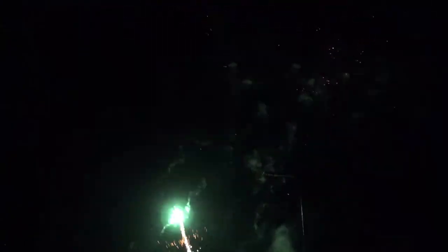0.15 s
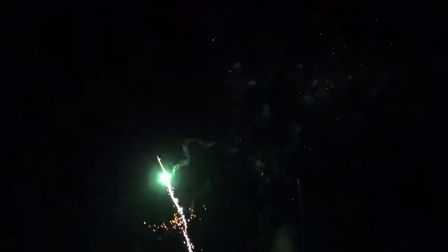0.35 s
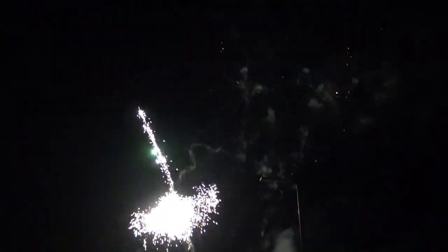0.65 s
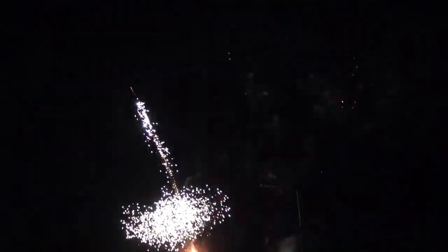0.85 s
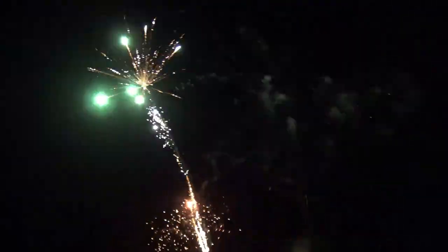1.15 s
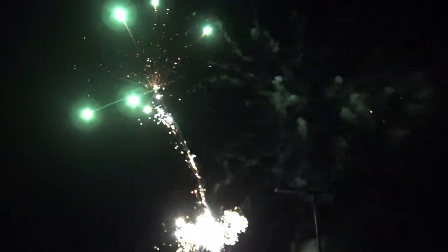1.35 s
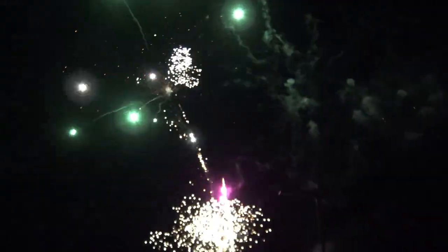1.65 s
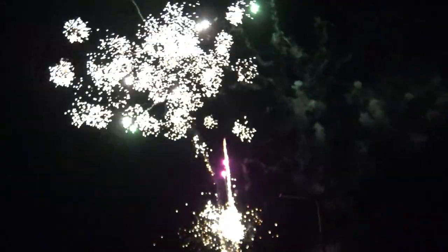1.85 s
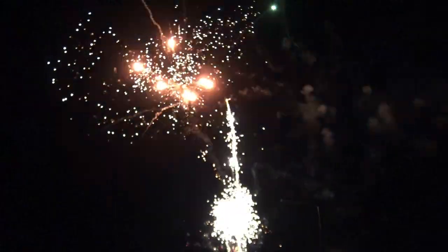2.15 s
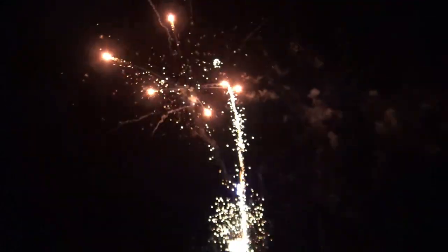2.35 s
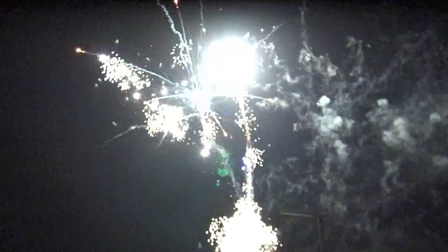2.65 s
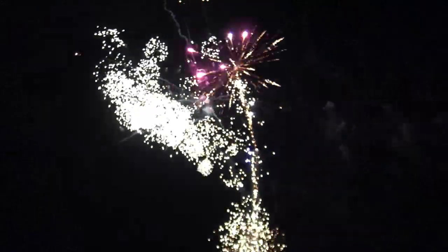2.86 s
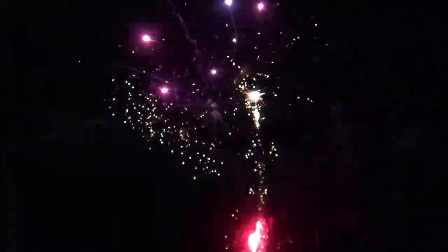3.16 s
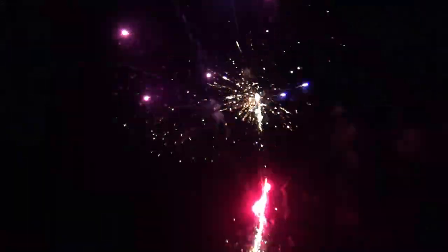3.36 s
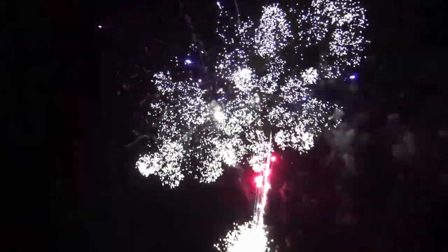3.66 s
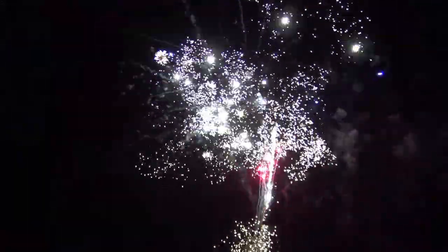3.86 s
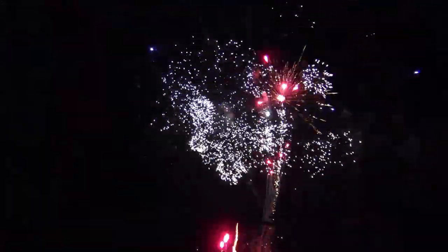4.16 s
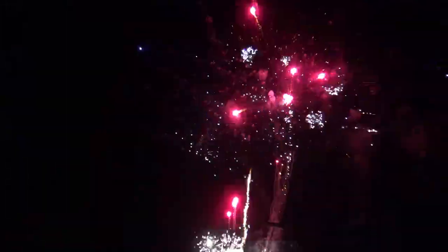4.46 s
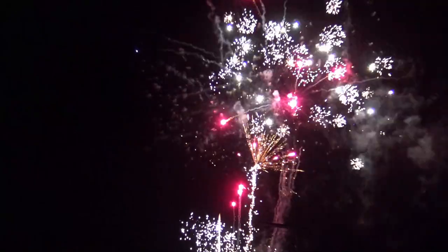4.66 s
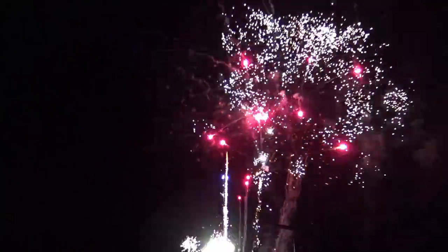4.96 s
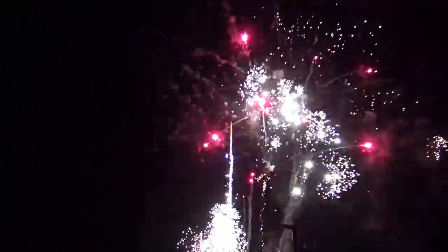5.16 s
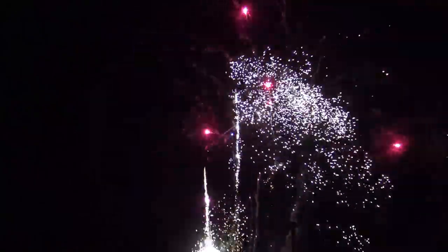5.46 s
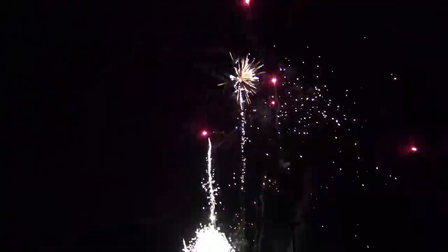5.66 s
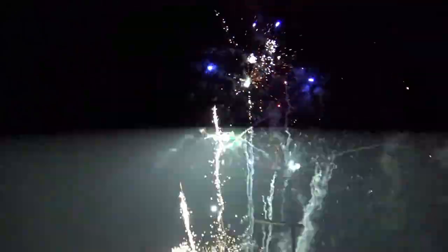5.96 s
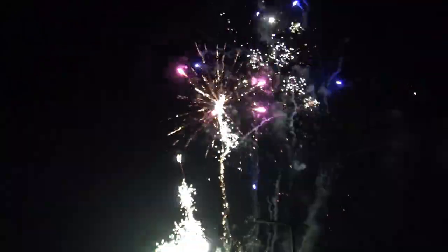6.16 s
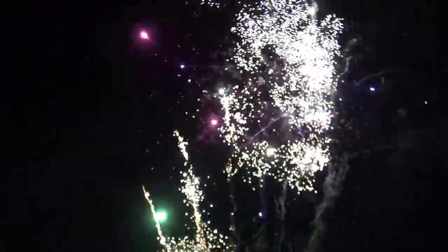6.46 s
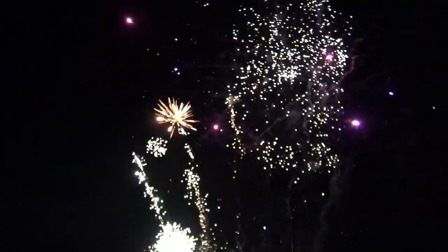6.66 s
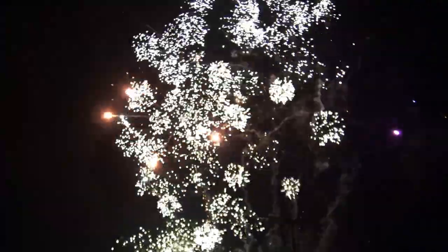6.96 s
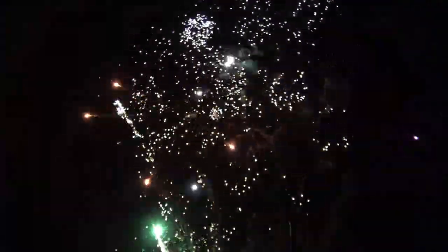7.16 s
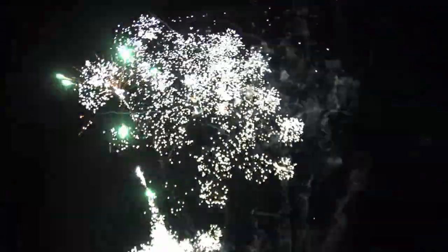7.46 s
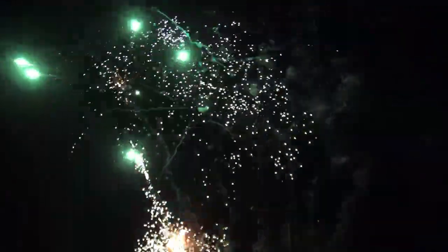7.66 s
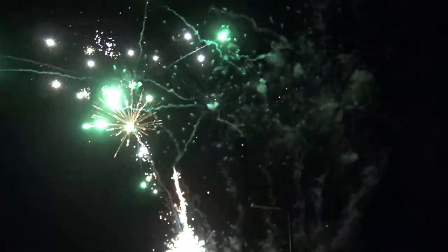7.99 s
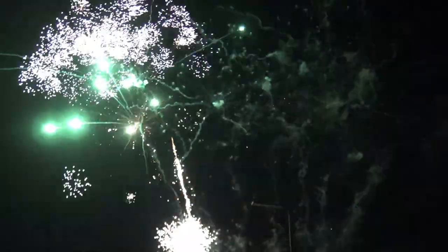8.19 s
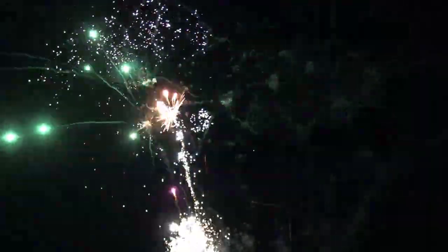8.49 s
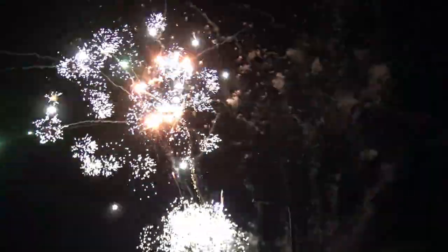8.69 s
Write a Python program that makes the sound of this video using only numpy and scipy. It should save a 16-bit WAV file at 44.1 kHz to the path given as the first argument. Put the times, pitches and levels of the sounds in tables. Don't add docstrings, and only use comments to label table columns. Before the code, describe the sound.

Close fireworks: punchy launch thuds, heavy shell bangs with short rolling echoes, and wave after wave of brittle, snapping crackle outdoors.

```python
import sys
import numpy as np
from scipy import signal
from scipy.io import wavfile

SR = 44100
rng = np.random.default_rng(int(sys.argv[2]) if len(sys.argv) > 2 else 0)


def wav_record(signal):
    frames = np.transpose(np.atleast_2d(signal))
    bounded = np.clip(frames, -1, 1)
    quanta = np.round(bounded * 32767).astype(np.int16)
    wavfile.write(sys.argv[1], SR, quanta)


def makeup_ratio(level_db):
    decades = np.asarray(level_db, float) / 20
    return 10 ** decades


N = 389403

# (time [s], peak [dB], ground echo delay [ms], ground echo [dB])
SHELL_BURSTS = [(1.1845, 5, 5.7, -6), (2.2379, 4, 6.3, -5), (2.9405, 5, 6.9, -5), (3.4018, 5, 6.6, -4),
                (4.2556, 5, 6.5, -5), (4.7473, 4, 4.6, -8), (5.8534, 5, 7.0, -4), (6.235, 5, 6.3, -5),
                (6.8615, 4, 5.8, -7), (7.5047, 5, 6.1, -7), (8.0897, 3.5, 5.3, -7), (8.6728, 4, 5.6, -7)]
# (time [s], peak [dB])
LIFT_CHARGES = [(.1206, 0), (.912, -1.5), (1.441, -2.5), (2.0289, -2.5), (3.0228, -3.5), (3.9264, -2),
                (4.5109, -3), (4.9969, -4.5), (5.5113, -5), (6.108, -4), (6.9194, -6), (8.0854, -6),
                (8.499, -6.5)]
# (delay [s], level [dB])
FAR_WALL = [
    (0.0795, -25.5),
    (0.1314, -16.5),
]
# (time [s], peak [dB])
FUSE_SPITS = [
    (0.1078, -14),
    (0.1394, -20.5),
    (0.195, -45),
]
# (thickest moment [s], level [dB], catching [s], dying [s])
STAR_CLOUDS = [(.85, -16.5, .17, 0.28), (1.18, -25.5, 0.17, 0.5), (1.65, -16, .23, 0.2),
               (2.02, -18, 0.16, 0.33), (2.2, -20, 0.18, 0.13), (2.36, -25, 0.167, 0.184),
               (2.56, -29, .12, 0.18), (2.92, -18, 0.28, 0.4), (2.72, -29, 0.099, .1),
               (3.42, -33.5, 0.14, 0.21), (3.8, -17.5, .28, .24), (4.09, -17, 0.16, 0.33),
               (4.54, -32, 0.088, 0.51), (4.94, -20.5, 0.14, 0.4), (5.22, -25.5, 0.079, .25),
               (5.451, -18, 0.14, 0.14), (5.61, -25.5, 0.089, 0.21), (5.759, -28, .15, .1),
               (5.889, -33, 0.12, 0.25), (6.24, -25.5, .25, 0.3), (6.57, -23.5, .24, .4),
               (6.89, -28, 0.19, 0.077), (7.09, -24.5, .17, .2), (7.281, -39, 0.087, 0.057),
               (7.62, -22.5, 0.27, 0.2), (7.92, -43.5, .25, 0.26), (8.11, -35.5, 0.063, 0.14),
               (8.37, -23.5, 0.29, 0.18), (8.69, -35, 0.058, 0.23), (8.84, -24.5, 0.11, .2)]
# (time [s], peak [dB])
LONE_SNAPS = [(0.0605, -3), (0.0778, -8), (0.484, -20), (0.5312, -8), (0.5345, -11), (0.5774, -9),
              (0.6025, -13), (0.6085, -10), (0.6766, 0), (0.6875, -5), (0.6953, -1), (0.7123, -1),
              (0.7246, -1), (0.7419, -1), (0.7461, 1), (0.7617, 0), (0.9728, -1), (1.102, 0),
              (1.1451, -2), (1.1741, 0), (1.2523, 0), (1.3132, -1), (1.3584, -1), (1.4053, -2),
              (1.4266, -1), (1.5005, 0), (1.7939, 0), (1.8341, -4), (1.9136, -1), (1.9289, 0),
              (2.4858, -7), (2.5101, -7), (2.5502, -2), (2.5968, -3), (2.6514, -3), (2.6824, -1),
                     (2.7018, 0), (2.7602, -1), (3.3059, -8), (3.3218, -5), (3.3437, -4), (3.3626, -7),
                     (3.4752, -4), (3.5285, -5), (3.5667, -6), (3.6232, 0), (3.9626, -5), (4.0025, -4),
                     (4.355, -4), (4.4279, -10), (4.4731, -13), (4.5407, -3), (4.5616, -5), (4.5948, 0),
                     (4.642, -4), (4.6523, -3), (4.6727, -1), (4.6994, -5), (4.7266, -1), (4.7877, -1),
              (5.1367, -4), (5.1802, -5), (5.2057, -2), (5.3044, -2), (5.3507, -6), (5.7333, -4),
                   (5.7818, -4), (5.8055, -4), (5.832, -6), (5.971, -14), (5.9996, -13), (6.0323, -14),
                   (6.0681, -11), (6.081, -10), (6.3712, -10), (6.4729, -5), (6.8103, -8), (6.9374, -5),
                   (6.9908, -8), (7.2702, -10), (7.3656, -15), (7.421, -11), (7.7424, -8), (7.8616, -14),
                   (7.9253, -17), (8.0158, -12), (8.3456, -2), (8.5784, -13), (8.6146, -11), (8.6262, -11),
              (0.6535, -12), (0.7449, 0), (1.5436, -1), (1.718, 0), (1.7536, 0), (1.8586, -6),
                  (1.94, -2), (1.9594, 0), (1.9738, 0), (2.3219, 0), (2.3301, -2), (2.3473, 0),
                  (2.3561, -1), (2.3683, 0), (2.6451, -2), (2.6964, -1), (2.7083, 0), (2.7122, 0),
                  (2.7255, -1), (2.7689, 0), (2.7835, 0), (3.0782, 0), (3.1251, 0), (6.1575, -8),
                  (6.1845, -7), (7.2112, -15), (8.665, -12), (8.717, -12), (8.7477, -10), (8.7735, -8)]
# (time [s], level [dB])
WIND_GUSTS = [(.1, -30), (.4, -39), (.8, -31), (1.35, -37), (2.04, -34), (2.45, -37), (3.46, -34.5),
              (4.13, -55), (6.149, -58), (5.0, -58), (6.98, -58), (7.6, -64), (8.14, -52)]

FINER_DB_PER_S = 0.82


def bursts():
    s, db, echo_ms, echo_db = np.transpose(SHELL_BURSTS)
    fronts = centred_clicks(s, makeup_ratio(db))
    fronts += centred_clicks(s + echo_ms / 1000, makeup_ratio(db + echo_db))
    boom = convolve(fronts, shell_shock())
    second_bounce = centred_clicks(s + echo_ms / 530, makeup_ratio(db - 12))
    bounce = band(convolve(second_bounce, shell_shock()), "low", 700)
    roll = np.zeros((2, N))
    roll_levels = 1.5 - 1.9 * s
    for start, roll_db in zip(np.round(s * SR).astype(int), roll_levels):
        near = makeup_ratio(-13) * clutter(start_ms=8, t60=.09, per_s=700, alike=.75)
        far = makeup_ratio(roll_db) * clutter(start_ms=18, t60=.38, per_s=600, alike=.65)
        shock = boom[:, start:start + SR // 100]
        echoes = convolve(np.pad(shock, [[0, 0], [0, SR // 2]]), near + far)
        roll[:, start:start + echoes.shape[1]] += echoes[:, :N - start]
    return boom + bounce + band(roll, "low", 490, order=1)


def shell_shock():
    ms = np.arange(SR // 50) / SR * 1000
    push = np.clip(1 - (ms / .6) ** 3, 0, 1)
    inward = np.abs(swing(hz=385, decay_ms=6, delay_ms=.6, cycles=.5))
    suction = -inward ** .5 * (ms < 1.9)
    rebound = (ms > 1.9) * (1 - np.exp(-(ms - 1.9) / .2)) * np.exp(-(ms - 1.9) / 3.2)
    return .85 * push + .6 * suction + .24 * rebound


def lifts():
    s, db = np.transpose(LIFT_CHARGES)
    fired = centred_clicks(s, makeup_ratio(db))
    grounded = fired + centred_clicks(s + .0018, makeup_ratio(db - 10))
    thump = convolve(grounded, 1.5 * blast(push_ms=.65, suck_ms=.45))
    thump += convolve(fired, .45 * swing(hz=178, decay_ms=60, delay_ms=.8, cycles=1))
    thump += puffs(s, makeup_ratio(db - 22.5), decay_ms=0.97)
    near = convolve(thump, clutter(start_ms=5.5, t60=.08, per_s=900, alike=.8))
    out = thump + makeup_ratio(-12) * near
    distant_crack = band(fired, "band", [900, 2000], order=1)
    wash = convolve(distant_crack, clutter(start_ms=72, t60=0.53, per_s=4900, alike=0.73))
    for delay, wall_db in FAR_WALL:
        shift = round(delay * SR)
        out[:, shift:] += makeup_ratio(wall_db) * band(thump, "low", 2200)[:, :-shift]
    spit_s, spit_db = np.transpose(FUSE_SPITS)
    return out + makeup_ratio(12.5) * wash + puffs(spit_s, makeup_ratio(spit_db), decay_ms=3.3)


def puffs(s, gain, decay_ms):
    white = rng.standard_normal((3, N))
    fading = np.exp(-np.arange(SR // 50) / SR * 1000 / decay_ms)
    turbulence = band(white[0] + .5 * white[1:], "band", [500, 9000], order=1)
    return convolve(centred_clicks(s, gain), fading) * turbulence


def crackle():
    s, gain = star_snaps()
    draws = rng.standard_normal((N // 8, 4))[:len(s)]
    lag, pan_db = 0.97 * draws[:, 0], 0.5 * draws[:, 1]
    echo_s = .003 + .002 * np.abs(draws[:, 2])
    echo_gain = makeup_ratio(-9 + 3 * draws[:, 3])
    patch = rng.integers(0, 10, N // 8)[:len(s)]
    out = np.zeros((2, N))
    for k in range(10):
        these = patch == k
        fronts = clicks(s[these], gain[these], lag[these], pan_db[these])
        ground = clicks((s + echo_s)[these], (gain * echo_gain)[these], -lag[these], pan_db[these])
        fronts += makeup_ratio(2.0) * band(ground, "low", 4300, order=1)
        paths = makeup_ratio(-12.5) * clutter(start_ms=0.41, t60=0.044, per_s=3000, alike=0.73)[:, :SR // 30]
        paths[:, 0] = 1
        snap = blast(push_ms=0.073 * 1.1226 ** k, suck_ms=0.088 * 1.113 ** k)
        out += convolve(fronts, convolve(paths, snap))
    dulled = band(out, "low", 6800, order=1)
    far = convolve(dulled, clutter(start_ms=30, t60=0.56, per_s=2700, alike=0.4))
    return out + makeup_ratio(-15.5) * far


def star_snaps():
    level_db = cloud_level()
    density_db = .95 * (np.maximum(level_db, -35) + 28) + FINER_DB_PER_S * np.arange(N) / SR
    lit = np.arange(N) > .68 * SR
    chance = rng.random((N, 2))

    small = np.flatnonzero(chance[:, 0] < 165 * makeup_ratio(density_db) * lit / SR)
    spread_db = 4.5 * np.minimum(-np.log(chance[small, 1]), 1.9)
    small_db = level_db[small] - density_db[small] / 2 + 15.0 + spread_db

    large = np.flatnonzero(chance[:, 0] > 1 - 16 * lit / SR)
    ceiling_db = 6 - FINER_DB_PER_S * large / SR
    large_db = np.minimum(level_db[large] + 18.5, ceiling_db) + 9.5 * chance[large, 1]

    lone = np.array(LONE_SNAPS)
    lone_s, lone_db = lone.T
    s = np.r_[lone_s - 2 / SR, large / SR, small / SR]
    return s, makeup_ratio(np.r_[lone_db + 2.5, large_db, small_db])


def cloud_level():
    edge_db, roundness, embers_db = 20.5, 1.7, -46
    t = np.arange(0, N + 64, 64) / SR
    s, db, catch_s, die_s = np.array(STAR_CLOUDS).T[:, :, None]
    away = np.abs(t - s) / np.where(t < s, catch_s, die_s)
    clouds_db = db - edge_db * away ** roundness
    level = power_sum(np.r_[clouds_db, [embers_db + 0 * t]])
    return np.interp(np.arange(N) / SR, t, level)


def night_air():
    lumps = makeup_ratio(2.0 * rms_one(band(rng.standard_normal((2, N)), "low", 4.3)))
    white = rng.standard_normal((3, N))
    rumble = band(0.7 * white[0] + white[1:], "band", [20, 60], order=1)
    wind = rms_one(lumps * rumble) * makeup_ratio([[-2.5], [2.5]])
    hush = rms_one(band(white[0] + white[1:], "band", [150, 2500]))
    return makeup_ratio(wind_level() + 4.0) * band(wind, "low", 83) + makeup_ratio(-47) * hush


def wind_level():
    t = np.arange(N) / SR
    breeze = -44 - 4.2 * t
    gusts = [db - 47 * np.abs(t - s) for s, db in WIND_GUSTS]
    return power_sum([breeze] + gusts)


def blast(push_ms, suck_ms):
    t = np.arange(SR // 50) / SR * 1000
    push = np.clip(1 - t / push_ms, 0, 1)
    after = np.maximum(t - push_ms, 0) / suck_ms
    suck = after * np.exp(-after)
    return push - suck * push.sum() / suck.sum()


def swing(hz, decay_ms, delay_ms, cycles):
    t = np.maximum(np.arange(SR // 50) / SR - delay_ms / 1000, 0)
    return -np.sin(2 * np.pi * np.minimum(hz * t, cycles)) * np.exp(-1000 * t / decay_ms)


def clutter(start_ms, t60, per_s, alike):
    t = np.arange(SR // 2) / SR
    taps = rng.standard_normal((3, len(t)))
    taps = taps * (rng.random((3, len(t))) < per_s * (1 + 40 * t) / SR)
    taps = np.sqrt(alike) * taps[0] + np.sqrt(1 - alike) * taps[1:]
    taps = taps * makeup_ratio(-60 * t / t60) * (t > start_ms / 1000)
    return taps / np.sqrt(np.sum(taps ** 2) / 2)


def clicks(s, gain, lag, pan_db):
    out = np.zeros((2, N + 2))
    for side, sign in enumerate((1, -1)):
        at = np.clip(s * SR + sign * lag / 2, 0, N - 1)
        whole = at.astype(int)
        port_gain = gain * makeup_ratio(sign * pan_db / 2)
        np.add.at(out[side], whole, port_gain * (1 - at + whole))
        np.add.at(out[side], whole + 1, port_gain * (at - whole))
    return out[:, :N]


def centred_clicks(s, gain):
    return clicks(s, gain, lag=0 * s, pan_db=0 * s)


def convolve(x, pulse):
    return signal.oaconvolve(x, np.atleast_2d(pulse), axes=1)[:, :N]


def band(x, kind, hz, order=2):
    sos = signal.butter(order, np.clip(hz, 10, .45 * SR), kind, fs=SR, output="sos")
    return signal.sosfilt(sos, x)


def rms_one(x):
    return x / np.sqrt(np.mean(x ** 2) + 1e-20)


def power_sum(levels_db):
    return 10 * np.log10(np.sum(makeup_ratio(2 * np.asarray(levels_db)), axis=0))


def scene():
    return lifts() + bursts() + crackle() + night_air()


def roll_off(x):
    return signal.sosfilt(signal.butter(12, 16510, fs=SR, output="sos"), x)


def record(dry):
    lifted = dry + 0.47 * band(dry, "band", [6500, 9000], order=1)
    heard = band(band(lifted, "low", 9950), "high", 65)
    flat = heard / (1 + np.abs(heard) ** 12) ** (1 / 12)
    return roll_off(flat)


dry = scene()
out = record(dry)
wav_record(out)
```